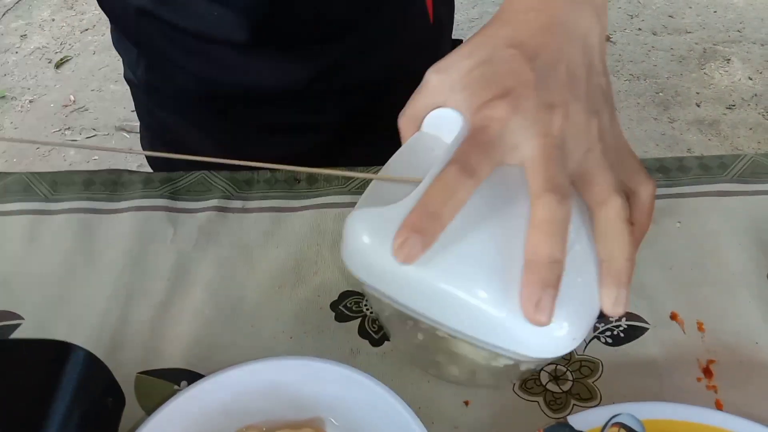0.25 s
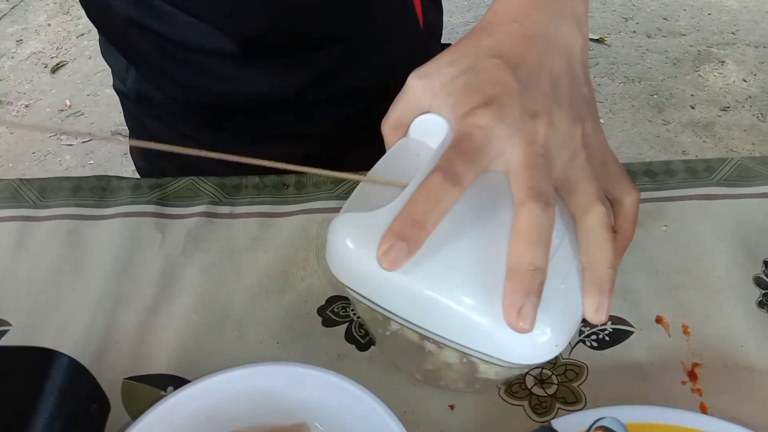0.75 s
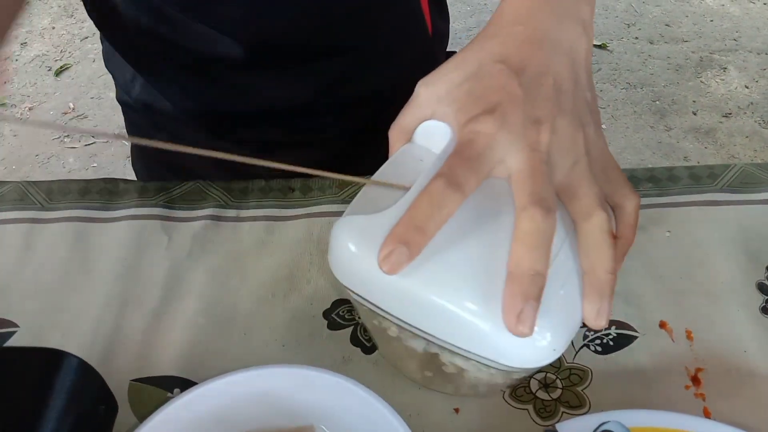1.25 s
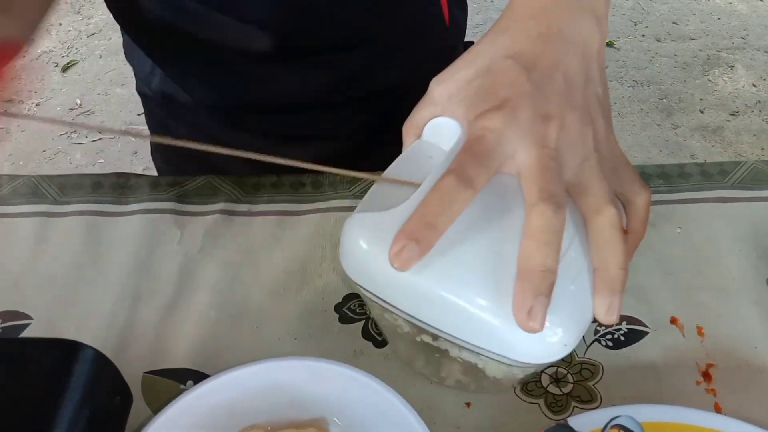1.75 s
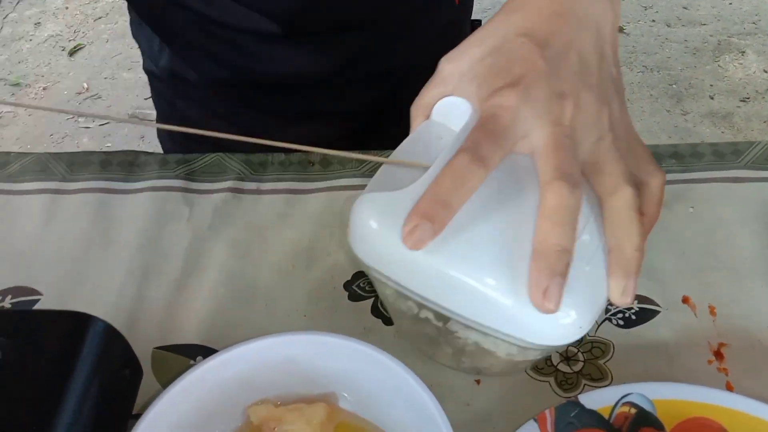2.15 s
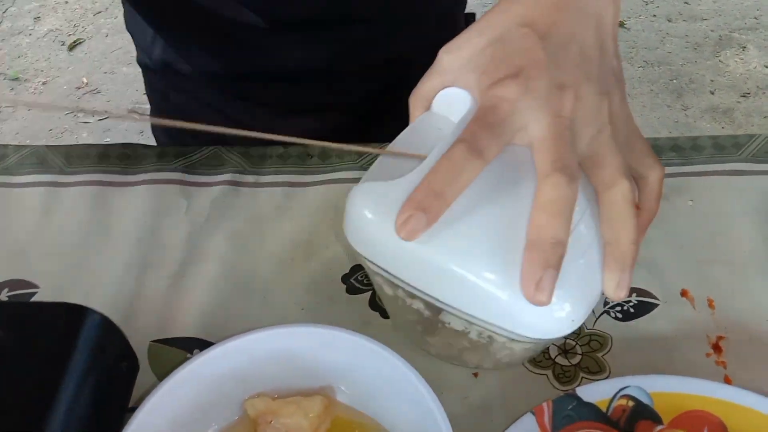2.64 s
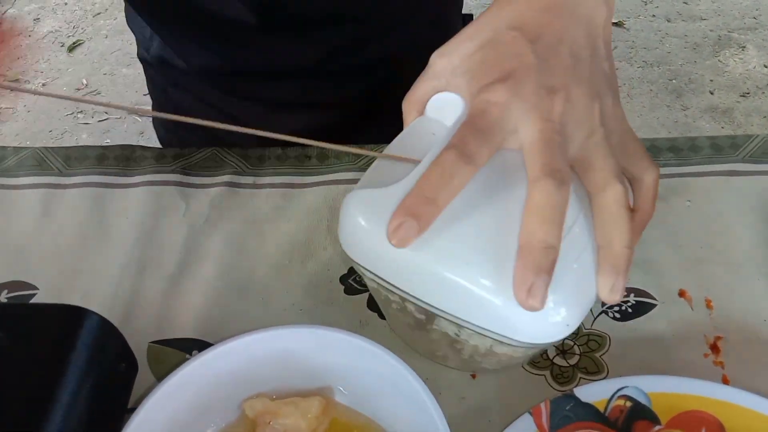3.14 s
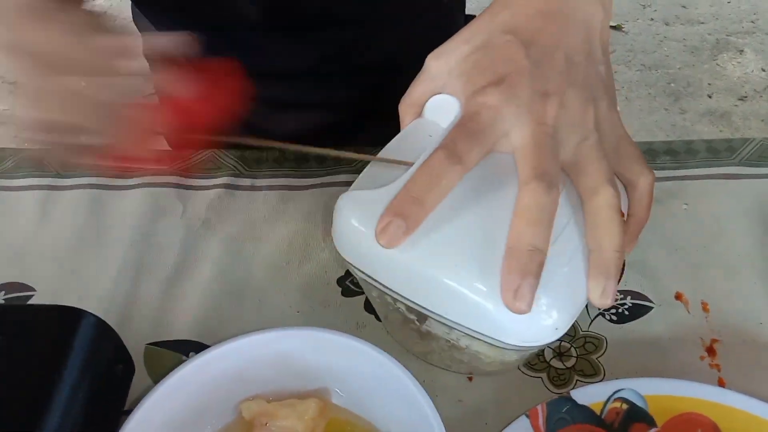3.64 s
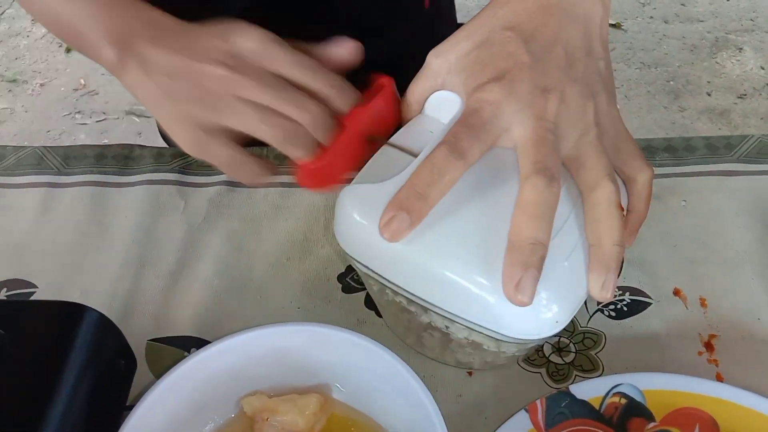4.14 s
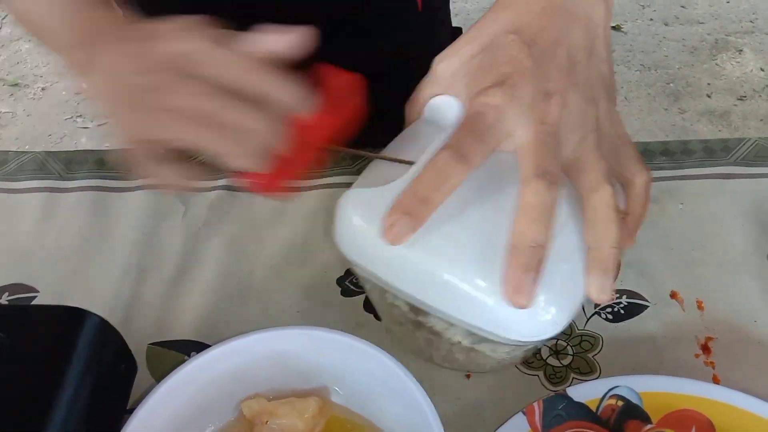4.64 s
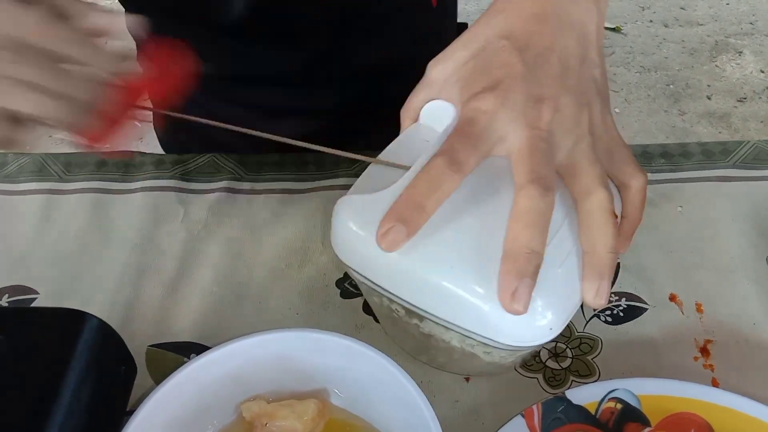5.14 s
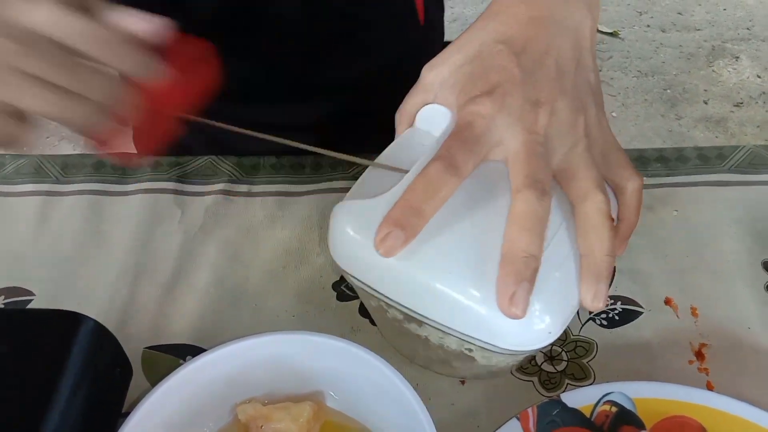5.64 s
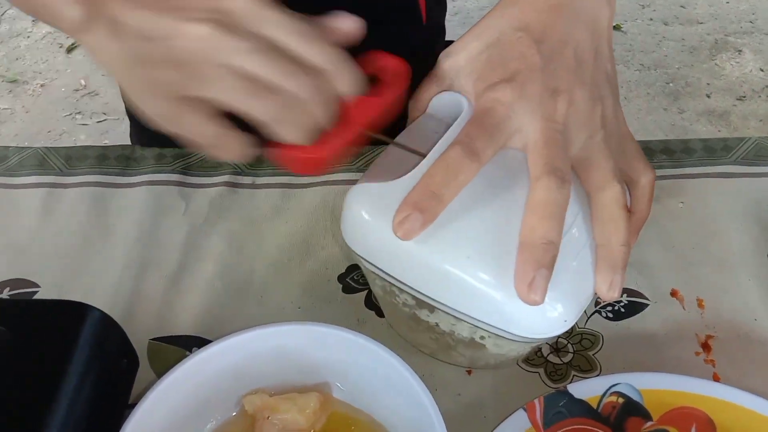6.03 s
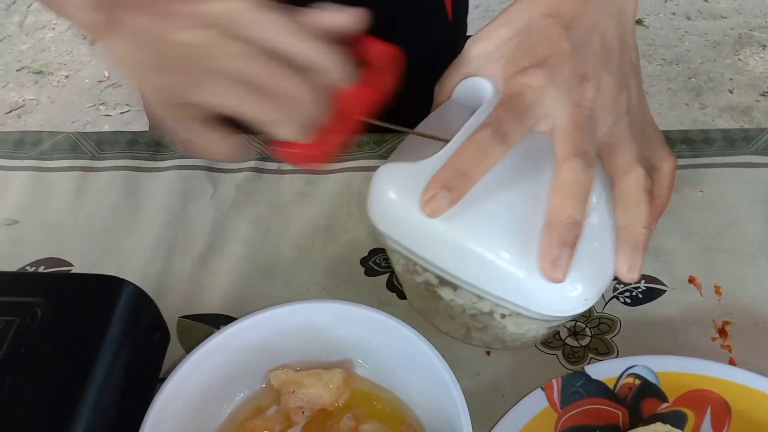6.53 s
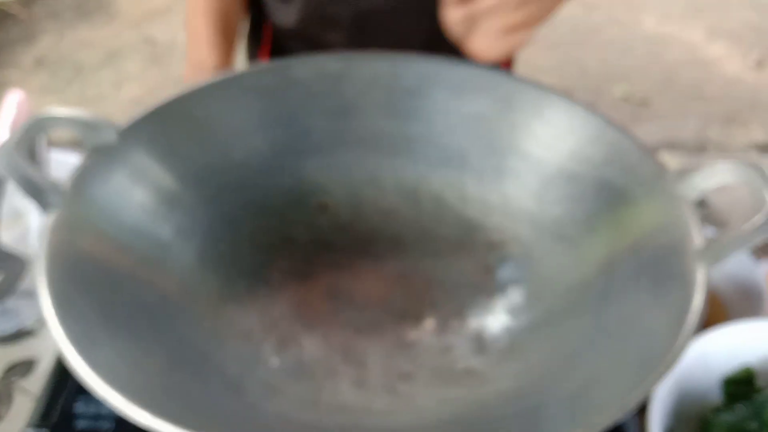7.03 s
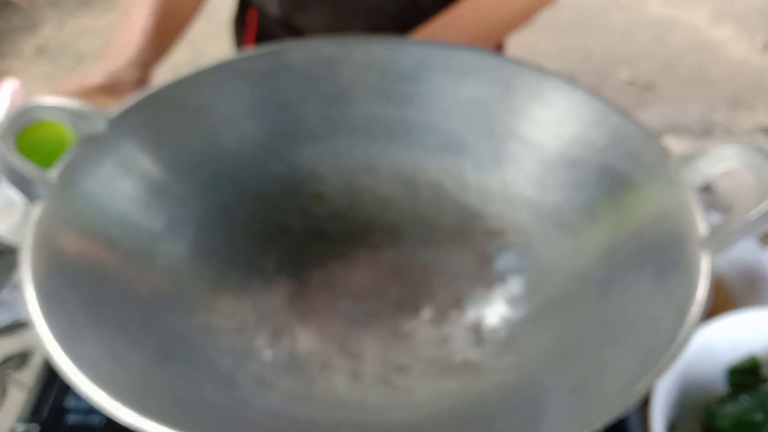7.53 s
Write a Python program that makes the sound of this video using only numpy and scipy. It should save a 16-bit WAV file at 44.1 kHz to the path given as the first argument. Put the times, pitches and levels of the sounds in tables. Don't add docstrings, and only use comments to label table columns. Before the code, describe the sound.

Close to the microphone on an outdoor table, a hand-pulled chopper runs briskly, about two strokes a second. Each stroke brings a sharp clack, a burst of rattling bits in a hollow plastic bowl, gear clicks and a short rewind whirr. High cicadas shimmer behind. Just before seven seconds it stops dead; a near-silent yard fades in with cicadas, slight rustling and a few soft metal pan taps.

```python
import sys
import numpy as np
from scipy import signal
from scipy.fft import rfft, irfft
from scipy.io import wavfile

SR = 44100
rng = np.random.default_rng(int(sys.argv[2]) if len(sys.argv) > 2 else 0)


def decibels_to_gain(level_db):
    exponent = np.asarray(level_db, float) / 20
    return 10 ** exponent


def master_out(mix):
    frames = np.transpose(np.atleast_2d(mix))
    ceiling = np.clip(frames, -1, 1)
    pcm = np.round(ceiling * 32767).astype(np.int16)
    wavfile.write(sys.argv[1], SR, pcm)


N = 342912
T = np.arange(N) / SR
HZ = np.maximum(np.fft.rfftfreq(8192, 1 / SR), 1)
CUT_S, END_S = 6.869, 7.775

# time in seconds, level in dB.
CICADA_LEVELS = [
    [(0, -42), (1.5, -41.5), (3, -41), (4.5, -41), (5.8, -39.5), (6.9, -46)],
    [(6.94, -63.5), (7.0, -62), (7.08, -55.5), (7.1, -47.5), (7.25, -42.5), (7.45, -44.5), (7.78, -44)],
]
# low edge in Hz, high edge in Hz, level in dB.
SONG_BANDS = [
    (6720, 7300, 0.1),
    (8880, 9330, -23),
    (13400, 15700, -17),
]
# centre in Hz, width in Hz, start in seconds, end in seconds, level in dB.
CRICKETS = [(5220, 130, 6.95, 7.1, -71), (5130, 200, 7.04, 7.18, -72), (4640, 110, 7.23, 7.38, -71),
            (4760, 70, 7.42, 7.9, -72), (1250, 50, 7.19, 7.31, -74), (1250, 50, 7.34, 7.42, -76),
            (1090, 90, 7.1, 7.25, -77), (215, 60, 7.12, 7.33, -68), (430, 120, 7.1, 7.45, -65),
            (2620, 140, 7.25, 7.43, -73), (2420, 75, 7.13, 7.25, -73)]
# time in seconds, air in dB, rustle in dB.
YARD_LEVELS = [(6.93, -92, -84), (7.074, -69.5, -88.5), (7.122, -69.5, -91.5), (7.218, -67, -62.5),
               (7.3, -67, -61), (7.33, -66, -73), (7.37, -66.5, -59), (7.46, -64, -63)]
# frequency in Hz, density in dB per Hz.
AIR_COLOUR = [(25, -22.5), (100, 0), (400, -10.5), (1700, -19.5), (4000, -21.5), (6200, -23.5), (7750, -40),
              (8050, -75), (8350, -39), (11500, -34.5), (15500, -38.5)]
# frequency in Hz, density in dB per Hz.
RUSTLE_COLOUR = [(700, -21), (1500, -17), (2500, -1.5), (3500, -2), (4500, -7.5), (6000, -12),
                 (9000, -34.5)]
# time in seconds, peak in dB, treble in dB relative to the peak, t60 in seconds.
TAPS = [(7.47, -25.5, -14, 0.095), (7.531, -32, -23, 0.315), (7.602, -29.5, -16.5, 0.23),
        (7.659, -36.5, -6.5, 0.145), (7.689, -35.5, -28.5, 0.12), (7.719, -36.5, -13, .1),
        (7.726, -31.5, -4.5, 0.141), (7.745, -35.5, -8.5, 0.089), (7.736, -37, -7.5, 0.15),
        (7.75, -36, -9, 0.1)]
# frequency in Hz, density in dB per Hz.
TAP_COLOUR = [(71, -57), (120, -27.5), (248, -7), (345, -12), (369, -10.5), (464, -13), (513, -8),
              (841, -3.5), (976, -16), (1270, -4.5), (1950, -25), (4610, -52.5), (6200, -41), (8060, -66.5),
              (13600, -120)]
# frequency in Hz, level in dB, t60 in seconds.
PAN_MODES = [(240.1, -11, 0.08), (483.7, -9.5, 0.109), (780.5, -10, 0.124), (1096, -5, 0.096),
             (1260, -9, 0.09), (1750, -13, .07), (2510, -15, 0.084), (2850, -14, .05)]

# frequency in Hz, density in dB per Hz.
SHELL_COLOUR = [(21, -63.5), (35, -45), (177, -13), (426, -14), (653, -8.5), (958, -11), (1280, 1.5),
                (1720, -3), (2950, -4), (3960, -14.5), (5420, -15), (6790, -10), (7600, -24), (9880, -52),
                (16700, -120)]
# centre in Hz, width in Hz, height in dB above the shell.
BOWL_MODES = [(79.4, 12, 7.5), (187.3, 79.5, 12), (340, 37, 2.5), (660.4, 170, 3), (815, 60, -1),
              (1280, 42, 4), (1905.3, 94, 7), (2335, 21, 8), (2964, 310, 2), (4456, 370, -1.5),
              (5283, 990, 9.5), (5904, 540, 4.5)]
# frequency in Hz, level in dB.
MIC_TREBLE = [(7000, -15.5), (7600, -21.5), (8200, -26.5), (9200, -21), (10500, -19), (13000, -22.5),
              (14200, -23), (14900, -5), (15600, -18)]
# frequency in Hz, level in dB.
SPOTS = [(660, -14), (820, -17), (1500, -10.5), (1890, -10.5), (2330, -13), (2900, -11), (3330, -18.5),
         (3750, -19.5), (5350, -12.5), (5950, -16)]
SPOT_SPREAD_DB, SPOT_DETUNE = 4.5, 0.03026

# pull at full speed in seconds, its level in dB, rewind at full speed in seconds,
# its level in dB, rewind run-out to 10 dB under full speed in seconds.
STROKES = [(-.1, -15, 0.0238, -18, 0.0925), (0.326, -22, 0.4912, -19.5, 0.1055),
           (0.77, -22, 0.936, -20, 0.1149), (1.25, -25, 1.44, -18.5, 0.0466),
           (1.707, -25, 1.83, -20.5, 0.1455), (2.148, -24.5, 2.33, -19.5, 0.1445),
           (2.624, -24, 2.776, -20, 0.1222), (3.084, -23.5, 3.253, -18, 0.0828),
           (3.544, -23.5, 3.71, -17.5, 0.0824), (3.981, -24.5, 4.145, -19.5, 0.1424),
           (4.44, -25.5, 4.61, -17, 0.07), (4.871, -25.5, 5.03, -18, 0.1044),
           (5.311, -26, 5.5, -20, 0.1247), (5.799, -30.5, 5.99, -24, 0.1726),
           (6.283, -29, 6.46, -18.5, 0.0715), (6.75, -26, 6.894, -28.5, 0.04)]
PULL_RISE_S, PULL_FALL_S, REWIND_RISE_S = 0.0922, 0.1088, 0.0774
IDLE_DB = -49
TABLE_SHARE = (-8, -19, -13, -13, -11)
LID_SHARE = (-9, -4.5, -12.0, -18.5, -25.5)
GEAR_SHARE = (-5, -9.5, -5, -6.5, -4)
EDGE_SHARE = (-0.5, -12.5, -5.5, -9.5, -5.5)
HUM_SHARE = (7.5, 3.5, -3.5, -7, 0)
# start in seconds, end in
# seconds, loss in dB.
LULLS = [(0.133, 0.176, 4.5), (0.566, 0.629, 8), (0.658, 0.703, 3), (0.458, 0.472, 6.5), (1.06, 1.115, 5.5),
         (1.471, 1.561, 4.5), (1.984, 2.018, 6), (2.21, 2.227, 4.5), (2.411, 2.491, 14), (2.51, 2.547, 0.5),
         (2.874, 2.963, 10.5), (3.381, 3.427, 0.5), (3.711, 3.716, 2), (4.251, 4.317, 9.5), (4.69, 4.69, 2),
         (5.108, 5.151, 6), (5.201, 5.248, 2), (5.611, 5.674, 5.5), (5.9, 5.944, 5), (6.086, 6.157, 6),
         (6.439, 6.459, 5), (6.543, 6.572, -10.5), (6.601, 6.644, 5), (6.816, 6.88, 5)]
LULL_ONSET_S = 0.016
# middle in seconds, top pitch in
# Hz, half length in seconds, level in dB.
WHIRRS = [(.08, 330, 0.075, -36), (.48, 330, 0.11, -44.5), (0.939, 370, 0.096, -37.5),
          (1.414, 360, 0.092, -43), (1.876, 401, 0.07, -36.5), (2.33, 378.4, 0.068, -39),
          (2.789, 380.4, 0.083, -39.5), (3.255, 355.5, 0.088, -34.5), (3.712, 379, 0.08, -37.5),
          (4.144, 370, 0.093, -36.5), (4.601, 408.6, 0.067, -33), (5.024, 399, 0.086, -35.5),
          (5.501, 329, .09, -35), (6.004, 299.4, 0.057, -40), (6.468, 343, 0.084, -41.5),
          (6.746, 419.5, 0.031, -35.5)]

# time in seconds, peak in dB, ring in Hz.
CLACKS = [(.193, -9, 1260), (.644, -12, 1223), (1.1122, -12, 1266), (1.572, -11.5, 1260), (2.035, -7, 1260),
          (2.496, -14, 1887), (2.971, -7.5, 1210), (3.4244, -17, 1864), (3.8668, -11.5, 1203),
          (4.315, -13.5, 1807), (4.702, -9.5, 2855), (4.754, -9.5, 1172), (5.194, -11, 1863),
          (5.676, -14, 1910), (6.162, -13, 1879), (6.573, -10, 2654), (6.648, -9, 1230)]
# time in seconds, peak in dB, ring in Hz, t60 in seconds.
CHOPS = [(0.248, -7.5, 1260, 0.049), (0.282, -8, 1287, 0.0327), (.335, -3, 1279, 0.0283),
         (.37, -8.5, 2199, 0.063), (.704, -11, 1309, 0.08), (0.74, -16.5, 1350, 0.038),
         (.789, -3.5, 2310, 0.0266), (1.176, -15, 1280, 0.112), (1.222, -10.5, 1335, 0.036),
         (1.259, -20.5, 1340, 0.054), (2.065, -9.5, 1280, 0.048), (2.108, -9.5, 1520, 0.0365),
         (2.16, -14, 1280, 0.075), (2.232, -13.5, 1259, 0.214), (2.622, -22, 1315, 0.066),
         (3.507, -13, 1280, 0.057), (3.914, -11.5, 1219, 0.047), (3.966, -13.5, 1330, 0.09),
         (5.243, -16, 1342, 0.049), (5.291, -7, 1410, 0.0265), (5.333, -16.5, 1280, 0.033),
         (5.7925, -9.5, 2736, 0.0351), (6.279, -10.5, 1355, 0.068), (6.762, -6.5, 1234, 0.0493)]
# time in seconds, peak in dB, ring in Hz, t60 in seconds.
SKIPS = [(0.023, -13, 1699, 0.124), (.475, -6, 1280, 0.056), (1.361, -12.5, 1260, 0.03),
         (1.388, -11, 1260, 0.244), (1.855, -6.5, 1445, 0.103), (1.883, -11, 3057, 0.13),
         (2.318, -4, 1399, 0.0477), (2.782, -8.5, 1437, 0.09), (3.242, -10, 1280, 0.034),
         (3.72, -3, 1239, 0.058), (4.092, -14, 1347, 0.071), (4.552, -9.5, 1750, 0.049),
         (4.572, -12, 1375, 0.24), (5.039, -8, 1260, 0.0244), (5.442, -13, 1286, 0.091),
         (5.514, -4.5, 1325, 0.0413), (5.984, -8, 1475, 0.053), (6.461, -6.5, 1427, 0.046)]
# time in seconds, peak in dB.
SNAPS = [(0.704, -13.5), (0.788, -6), (3.245, -13.5), (3.269, -13), (3.719, -11.5), (6.77, -13.5),
         (6.573, -15), (1.057, -32.5), (1.418, -12), (2.3, -19), (2.318, -10.5), (2.701, -17.5),
         (3.692, -10.5), (5.292, -9), (6.464, -21.5), (5.022, -10), (4.896, -15), (4.862, -15),
         (5.883, -18), (5.04, -11), (4.704, -14), (5.194, -15), (.887, -14), (.907, -13)]
# time in seconds, peak in dB, ring in Hz.
KNOCKS = [(0.048, -6, 2820), (0.108, -12, 2816), (0.431, -6.5, 1720), (0.457, -3.5, 1260),
          (0.502, -9.5, 1260), (0.676, -25.5, 1290), (0.824, -9.5, 1275), (0.85, -10.5, 1280),
          (0.904, -6.5, 1666), (0.93, -10, 2900), (1.293, -16.5, 1280), (1.308, -6.5, 1335),
          (1.629, -18.5, 1204), (1.642, -15.5, 1280), (1.717, -8.5, 1340), (1.767, -12, 1318),
          (1.801, -13, 1390), (2.189, -11.5, 1244), (2.264, -16.5, 1280), (2.286, -10.5, 1240),
          (2.754, -12, 1326), (3.048, -14, 1170), (3.109, -14.5, 1247), (3.16, -13.5, 1288),
          (3.194, -6.5, 1850), (3.214, -10.5, 1880), (3.269, -7.5, 1861), (3.299, -12, 1950),
          (3.47, -26, 1310), (3.539, -11.5, 1260), (3.616, -7.5, 1265), (3.639, -10, 1323),
          (3.665, -5.5, 1260), (3.942, -10.5, 1363), (4.054, -11, 1267), (4.138, -1, 1850),
          (4.375, -15, 1317), (4.453, -13.5, 1280), (4.8, -21, 1530), (4.831, -20, 1280),
          (4.861, -10.5, 1227), (4.895, -13, 1273), (4.937, -16.5, 1312), (5.153, -16, 1400),
          (5.405, -12, 1290), (5.727, -15.5, 1327), (5.856, -21.5, 1330), (5.882, -17, 1260),
          (5.946, -10, 2806), (5.963, -10.5, 1882), (6.003, -7, 1323), (6.212, -33.5, 1250),
          (6.256, -16, 1287), (6.33, -19, 1260), (6.356, -13.5, 1280), (6.428, -10.5, 1435),
          (6.529, -7, 2940), (6.71, -13, 1440), (6.737, -8, 1435), (6.856, -11.5, 1280)]
CLACK_T60_S, CLACK_RATTLE_DB, CHOP_RATTLE_DB, SKIP_RATTLE_DB = 0.048, -13.0, -18.5, -14.5
SNAP_T60_S, SNAP_RATTLE_DB, SNAP_HZ = 0.0063, -2, 6280
KNOCK_T60_S, KNOCK_RATTLE_DB, KNOCK_DB = 0.0445, -13.5, -3.5
THUD_HZ, THUD_DB, THUD_T60_S = 180.2, -17.5, 0.0526
# time in seconds, peak in dB.
CHIPS = [(0.0238, -20), (0.193, -21), (0.3217, -25), (0.4349, -25), (0.4584, -23), (0.473, -16.5),
         (0.643, -34.5), (0.7862, -19.5), (0.849, -29.5), (0.9408, -18), (1.0553, -24), (1.1127, -24),
         (1.2221, -25.5), (1.3618, -27.5), (1.5715, -23.5), (1.8253, -23), (1.8557, -18.5), (1.881, -14.5),
         (2.0331, -20.5), (2.065, -24.5), (2.2994, -19.5), (2.3171, -20), (2.3498, -18.5), (2.496, -26.5),
         (2.6395, -21), (2.7003, -26), (2.7501, -26.5), (2.783, -17.5), (2.9714, -21), (3.201, -17),
         (3.2443, -16.5), (3.5401, -18.5), (3.6726, -24), (3.692, -13.5), (3.7174, -17), (3.8671, -33.5),
         (4.0896, -22.5), (4.138, -16), (4.3161, -24), (4.3957, -17), (4.4575, -19.5), (4.5531, -21.5),
         (4.574, -16.5), (4.7046, -29), (4.7559, -27.5), (4.989, -21.5), (5.0397, -19), (5.1936, -24),
         (5.2915, -19.5), (5.4415, -24.5), (5.4824, -19.5), (5.5137, -22), (5.678, -28), (5.7933, -21.5),
         (5.9466, -27), (5.9843, -18.5), (6.162, -27), (6.46, -20.5), (6.574, -37), (6.6514, -29.5)]
CHIP_T60_S, CHIP_DB = 0.0195, 2
# start in seconds, length in seconds, first pitch in Hz,
# last pitch in Hz, level in dB.
SQUEAKS = [(0.044, 0.046, 444, 519, -28.5), (2.463, 0.0275, 2900, 2850, -35.5),
           (2.925, 0.059, 390, 503, -45.5), (2.938, 0.038, 1660, 1860, -45),
           (3.357, 0.055, 1390, 1500, -36), (3.799, 0.055, 1880, 1844, -43),
           (6.597, .04, 1490, 1550, -54.5), (6.584, 0.039, 3780, 3830, -43)]
# time in seconds, peak in dB, pitch in Hz.
TUGS = [(0.331, -38.5, 83), (0.712, -41.5, 102.8), (0.923, -40, 106.7), (1.249, -51, 89), (1.72, -43, 72.7),
        (2.156, -39.5, 84.3), (2.627, -40, 88.8), (3.062, -39, 83.6), (3.559, -41.5, 87.5),
        (3.986, -40, 109.2), (4.459, -39.5, 95.8), (4.838, -42.5, 106.6), (5.291, -48.5, 78.5),
        (6.299, -45, 108)]
TUG_RISE_S, TUG_DB = 0.022, -2


def in_time(rows):
    s, *columns = np.transpose(rows)
    return [np.interp(T, s, column) for column in columns]


def at_hz(points):
    hz, db = np.array(points).T[:2]
    return np.interp(np.log(HZ), np.log(hz), db)


def rms_one(x):
    return x / np.sqrt(np.mean(x ** 2) + 1e-20)


def coloured(x, shape_db):
    cepstrum = irfft(np.log(decibels_to_gain(np.maximum(shape_db, -120))))
    cepstrum[1:4096] *= 2
    cepstrum[4097:] = 0
    response = irfft(np.exp(rfft(cepstrum)))
    response = response / np.sqrt(np.sum(response ** 2))
    return signal.oaconvolve(x, response)[:N]


def region_db(low_hz, high_hz, order=6):
    low_skirt = 1 + (low_hz / HZ) ** (2 * order)
    high_skirt = 1 + (HZ / high_hz) ** (2 * order)
    return -10 * np.log10(low_skirt * high_skirt)


def resonance_db(hz, width):
    return -20 * np.log10(1 + (2 * (HZ - hz) / width) ** 2)


def drift(rate):
    r = np.exp(-2 * np.pi * rate / SR)
    noise = rng.standard_normal(N + SR)
    return rms_one(signal.lfilter([1], [1, -2 * r, r * r], noise)[SR:])


def grains(per_s, spread_db, clump_db):
    sizes = decibels_to_gain(spread_db * np.minimum(rng.exponential(1, N), 4)) * rng.choice([-1, 1], N)
    born = rng.random(N) < per_s / SR
    return rms_one(sizes * born * decibels_to_gain(clump_db * drift(50)))


def bursts(times, levels_db, t60s, noise):
    out = np.zeros(N)
    for s, level_db, t60 in zip(times, levels_db, t60s):
        t60, start = max(t60, .005), round(s * SR)
        t = T[:int(t60 * SR)][:N - start]
        out[start:][:len(t)] += decibels_to_gain(level_db - 60 * t / t60) * np.minimum(t / 0.001375, 1)
    return out * noise


def cicadas():
    before, after = (in_time(rows)[0] for rows in CICADA_LEVELS)
    flutter = rms_one(decibels_to_gain(1.1 * drift(25) + 2.0 * drift(150)))
    song = np.zeros(N)
    for low_hz, high_hz, db in SONG_BANDS:
        singers = flutter * rng.standard_normal(N)
        song += decibels_to_gain(db) * coloured(singers, 1.5 * region_db(low_hz, high_hz, order=40))
    return decibels_to_gain(np.where(T < CUT_S + .04, before, after)) * song


def crickets():
    out = np.zeros(N)
    for hz, width, start, end, db in CRICKETS:
        swell = np.clip(np.minimum((T - start) / .04, (end - T) / .05), 0, 1)
        tone = (width <= 70) * np.sqrt(8 * width / SR) * np.sin(2 * np.pi * hz * T)
        out += decibels_to_gain(db) * swell * coloured(rng.standard_normal(N) + tone, resonance_db(hz, width))
    return out


def pan_rings(gain_db):
    out, t = np.zeros(N + SR), T[:SR // 4]
    hz, db, t60 = np.transpose(PAN_MODES)[..., None]
    strengths = rng.standard_normal((len(TAPS), len(PAN_MODES), 1))
    for (s, peak_db, *_), uneven in zip(TAPS, strengths):
        decay = decibels_to_gain(peak_db + gain_db + db + 4.33 * uneven - 60 * t / t60)
        modes = decay * np.sin(2 * np.pi * hz * t)
        out[round(s * SR):][:len(t)] += modes.sum(0) * np.minimum(t / 0.00186, 1)
    return out[:N]


def yard():
    air_db, rustle_db = in_time(YARD_LEVELS)
    air = decibels_to_gain(air_db + 3.0 + 1.0 * drift(8.1)) * coloured(rng.standard_normal(N), at_hz(AIR_COLOUR))
    leaves = grains(6000, spread_db=1.5, clump_db=3)
    rustle = decibels_to_gain(rustle_db + .5) * coloured(leaves, at_hz(RUSTLE_COLOUR))
    s, peak_db, treble_db, t60 = np.transpose(TAPS)
    noise, pan_db = rng.standard_normal(N), at_hz(TAP_COLOUR)
    dull = coloured(bursts(s, peak_db - 12, 0.747 * t60, noise), 1.21 * pan_db + region_db(1, 1975))
    bright = bursts(s, peak_db + treble_db - 3.0, 0.74 * t60, noise)
    bright = coloured(bright, pan_db + region_db(2690, 5520))
    return air + rustle + dull + bright + crickets() + pan_rings(gain_db=-7.5)


def tugs():
    out, t = np.zeros(N), T[:SR // 3]
    swell = t / TUG_RISE_S * np.exp(1 - t / TUG_RISE_S)
    for s, db, hz in TUGS:
        out[round(s * SR):][:len(t)] += decibels_to_gain(db + TUG_DB) * swell * np.sin(2 * np.pi * hz * t)
    return out


def thuds():
    out, t = np.zeros(N), T[:SR // 8]
    ring = np.sin(2 * np.pi * THUD_HZ * t) * np.minimum(t / 0.0027, 1)
    for s, db, _ in CLACKS:
        out[round(s * SR):][:len(t)] += decibels_to_gain(db + THUD_DB - 60 * t / THUD_T60_S) * ring
    return out


def creaks():
    out, waver = np.zeros(N), drift(55)
    for s, length, from_hz, to_hz, db in SQUEAKS:
        share = np.clip((T - s) / length, 0, 1)
        pitch = (from_hz + (to_hz - from_hz) * share) * (1 + .03 * waver)
        tone = np.sin(2 * np.pi * np.cumsum(pitch) / SR)
        swell = np.sqrt(np.sin(np.pi * share).clip(0)) * (share < 1)
        out += decibels_to_gain(db - 2.5 + 4.5 * waver) * swell * tone
    return out


def whirr():
    pitch, level = np.full(N, 150.), np.zeros(N)
    for middle, top_hz, half, db in WHIRRS:
        reach = np.where(T < middle, half, 1.15 * half)
        arc = np.clip(1 - ((T - middle) / reach) ** 2, 0, 1)
        pitch = np.where(arc > 0, top_hz * (.42 + 0.56 * arc ** .8), pitch)
        tilt_db = 1.5 * np.clip((T - middle) / half, -1, 1)
        level += decibels_to_gain(db + tilt_db) * np.minimum(3 * arc, 1)
    turn = 2 * np.pi * np.cumsum(pitch * (1 + .055 * drift(35))) / SR
    table = decibels_to_gain(5.0 / (1 + ((pitch - THUD_HZ) / 50) ** 2))
    return level * table * (.7 + .5 * drift(55)) * (np.sin(turn) + decibels_to_gain(-17) * np.sin(2 * turn))


def chips(noise):
    s, db = np.transpose(CHIPS)
    ticks = bursts(s, db + CHIP_DB, CHIP_T60_S + 0 * s, noise)
    return coloured(ticks, at_hz(MIC_TREBLE) + region_db(7800, 17900))


def loose_bits(per_s, cycles, count=28):
    clicks = grains(per_s, spread_db=2.5, clump_db=1.56)
    dealt, out = rng.integers(0, count, N), np.zeros(N)
    for k, hz in enumerate(np.geomspace(480, 7400, count)):
        r, w = decibels_to_gain(-60 * hz / (cycles * SR)), 2 * np.pi * hz / SR
        patch = decibels_to_gain(np.interp(T, np.linspace(0, T[-1], 120), 3.66 * rng.standard_normal(120)))
        ring = signal.lfilter([0, 1], [1, -2 * r * np.cos(w), r * r], clicks * (dealt == k) + 1e-18)
        out += np.sqrt(hz) * patch * rms_one(ring)
    return rms_one(out)


def all_blows():
    clacks = [(s, db, CLACK_RATTLE_DB, CLACK_T60_S, hz) for s, db, hz in CLACKS]
    chops = [(s, db, CHOP_RATTLE_DB, t60, hz) for s, db, hz, t60 in CHOPS]
    skips = [(s, db, SKIP_RATTLE_DB, t60, hz) for s, db, hz, t60 in SKIPS]
    snaps = [(s, db, SNAP_RATTLE_DB, SNAP_T60_S, SNAP_HZ) for s, db in SNAPS]
    knocks = [(s, db + KNOCK_DB, KNOCK_RATTLE_DB, KNOCK_T60_S, hz) for s, db, hz in KNOCKS]
    return clacks + chops + skips + snaps + knocks


def blow_rings(gain_db, length):
    out, blows = np.zeros(N), all_blows()
    spot_hz, spot_db = np.transpose(SPOTS)[..., None]
    chances = rng.standard_normal((len(blows), 2, len(SPOTS), 1))
    for (s, peak_db, _, t60, hz), (uneven, detune) in zip(blows, chances):
        t = T[:int(max(length * t60, .005) * SR)]
        struck = np.sin(2 * np.pi * hz * t)
        others = np.sin(2 * np.pi * spot_hz * (1 + SPOT_DETUNE * detune) * t)
        others = decibels_to_gain(spot_db + SPOT_SPREAD_DB * uneven) * others
        decay = decibels_to_gain(peak_db + gain_db - 60 * t / t[-1]) * np.minimum(t / 0.00251, 1)
        out[round(s * SR):][:len(t)] += decay * (struck + others.sum(0))
    return out


def slack_db(blows, depth_db, lead_s):
    catches = np.array(blows)[:, 0]
    to_go = np.append(catches, 99)[np.searchsorted(catches, T)] - T
    return -depth_db * np.exp(-to_go / lead_s)


def lull_db():
    return -sum(db * np.clip((T - start) / LULL_ONSET_S, 0, 1) * (T < end) for start, end, db in LULLS)


def hump(middle, top_db, rise, fall, steep):
    rising = T < middle
    away = np.abs((T - middle) / np.where(rising, rise, fall))
    return decibels_to_gain(2 * top_db - 20 * away ** np.where(rising, 1.79, steep))


def work():
    pull, late, rewind, ending = np.zeros((4, N))
    for pull_s, pull_db, back_s, back_db, fall in STROKES:
        pull += hump(pull_s, pull_db, PULL_RISE_S, PULL_FALL_S, steep=1.62)
        late += np.clip((T - pull_s) / 0.12 + 0.343, 0, 1) * (T > pull_s - .2) * (T < back_s)
        rewind += hump(back_s, back_db, REWIND_RISE_S, fall, steep=1.775)
        ending += np.clip((T - back_s) / fall - .3, 0, 1) * (T < back_s + .2)
    idle = np.full(N, decibels_to_gain(2 * IDLE_DB))
    states = np.array([pull * (1 - late), pull * late, rewind * (1 - ending), rewind * ending, idle])
    total = states.sum(0)
    shares = (TABLE_SHARE, LID_SHARE, GEAR_SHARE, EDGE_SHARE, HUM_SHARE)
    return [10 * np.log10(total)] + [np.dot(share, states) / total for share in shares]


def chopper():
    body_db = np.where(HZ < 7000, at_hz(SHELL_COLOUR), at_hz(MIC_TREBLE)) + region_db(45, 30000, order=1)
    body_db = body_db + sum(db / (1 + (2 * (HZ - hz) / width) ** 2) for hz, width, db in BOWL_MODES)
    bowl_db, table_db, lid_db, gear_db, edge_db, hum_db = work()
    bowl_db = bowl_db + lull_db() + 1.5
    bowl_db += slack_db(CLACKS, depth_db=7.5, lead_s=0.059)
    bowl_db += slack_db(sorted(all_blows()), depth_db=3.0, lead_s=0.00808)
    s, peak_db, rattle_db, t60, _ = np.transpose(all_blows())
    knock_db = -22.5
    contacts, crack = grains(5000, spread_db=3.0, clump_db=0.0), rng.standard_normal(N)
    ticks = grains(1800, spread_db=8.0, clump_db=4.0)
    judder_db = 1.078 * drift(57)
    bits = loose_bits(3200, cycles=50)
    teeth = bits + decibels_to_gain(-4.0) * grains(500, spread_db=5.0, clump_db=3.0)
    settled = np.clip((T - 5.3) / 0.39, 0, 1)
    # low Hz, high Hz, steady dB, blow dB, share of contacts, blow length factor, loose layer, its dB.
    parts = [
        (1, 124.8, -.6 * bowl_db - 39.5, knock_db - 21.0, 0.18, 0.64, ticks, -19.5),
        (138.5, 442, table_db - 4.5, knock_db - 4.0, 0.44, 1.07, ticks, -26.0),
        (501.1, 1059, lid_db - 4.5 - 2.8 * settled, knock_db, 0.59, 1.58, bits, 9.0),
        (916, 4120, -3.5, -10.5, 0.4, 1.042, teeth, 0.5),
        (3902, 7120, gear_db - 0.5, rattle_db, 0.56, 1.164, teeth, 2.0),
        (7660, 11870, edge_db + 0.0835 * bowl_db - 5.5, rattle_db - 10.0, 0.92, 1.0, ticks, 0.0),
        (13300, 14370, edge_db + 0.13 * bowl_db - 3.0, rattle_db, 0.1, 0.38, ticks, 9.5)]
    gusts = decibels_to_gain(0.832 * bowl_db + hum_db - 16.5 + 3.0 * drift(30)) * crack
    out = coloured(gusts, resonance_db(1275, 220))
    out += coloured(whirr(), region_db(125, 900, order=4)) * decibels_to_gain(-14.5)
    out += creaks() + thuds() + tugs() + chips(crack) + blow_rings(gain_db=-8.0, length=1.112)
    for low_hz, high_hz, steady_db, blow_db, grainy, ring, loose, loose_db in parts:
        smooth = np.sqrt(1 - grainy) * rng.standard_normal(N) * decibels_to_gain(1.5 * drift(28))
        rattle = np.sqrt(grainy) * contacts + smooth + decibels_to_gain(loose_db - 7.5) * loose
        shake = decibels_to_gain(bowl_db + steady_db + judder_db - 2.0) * rattle
        blows = bursts(s, peak_db + blow_db, ring * t60, crack)
        out += coloured(shake + blows, body_db + region_db(low_hz, high_hz))
    return out


def scene():
    first = np.where(T < CUT_S, 1, decibels_to_gain(-46 - 5000 * (T - CUT_S)))
    second = np.clip((T - 6.945) / .06, 0, 1) * (T < END_S)
    return (first * chopper() + (first + second) * cicadas() + second * yard())[None]


def roll_off(x):
    return signal.sosfilt(signal.butter(12, 16800, fs=SR, output="sos"), x)


def record(dry):
    low_pass = signal.cheby2(16, 40, 15780, fs=SR, output="sos")
    cut = signal.sosfilt(low_pass, dry)
    return roll_off(1.574 * np.tanh(cut / 1.6132))


dry = scene()
out = record(dry)
master_out(out)
```